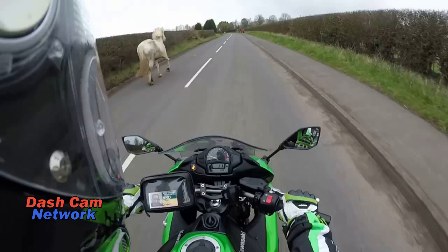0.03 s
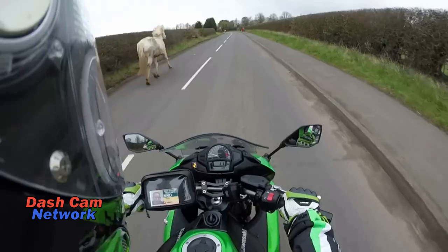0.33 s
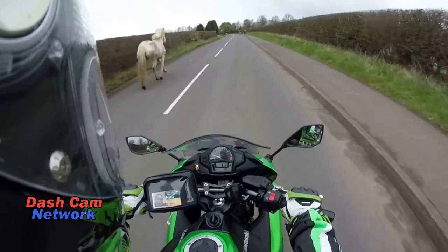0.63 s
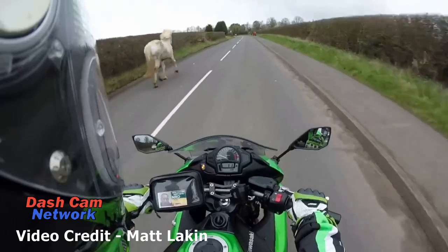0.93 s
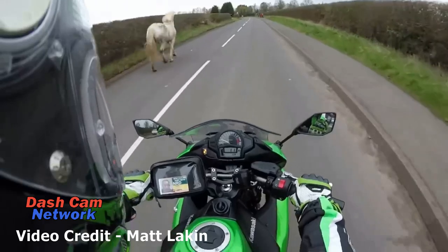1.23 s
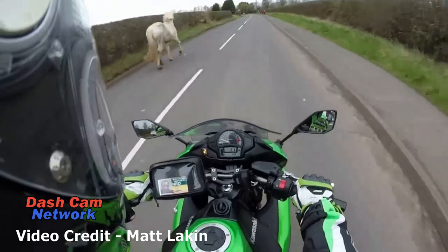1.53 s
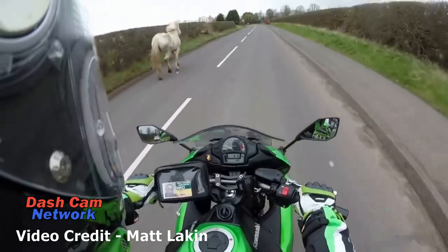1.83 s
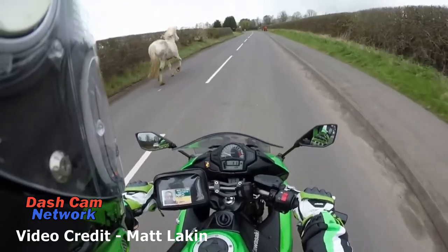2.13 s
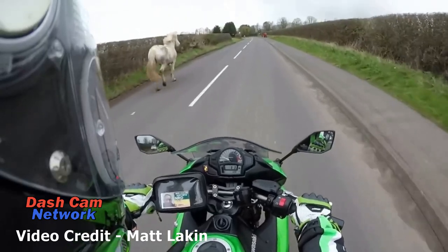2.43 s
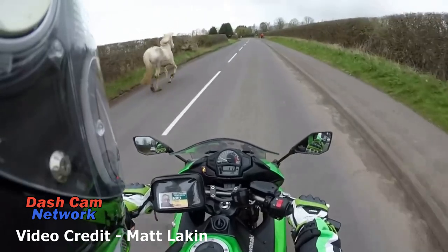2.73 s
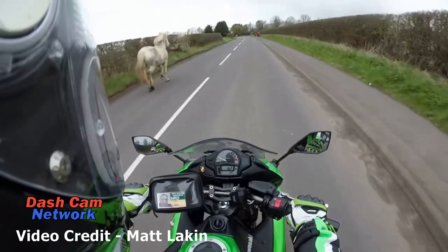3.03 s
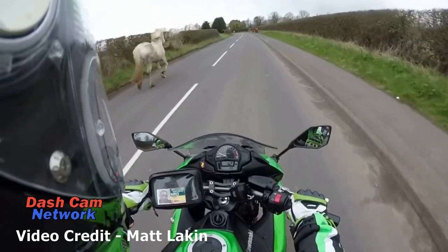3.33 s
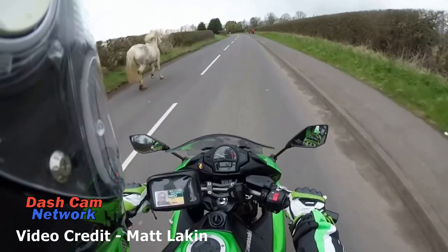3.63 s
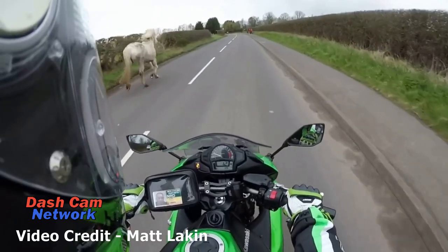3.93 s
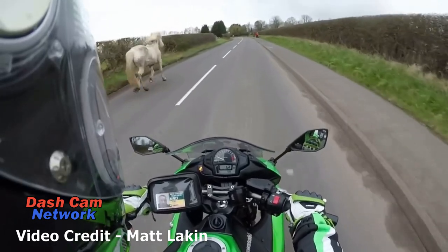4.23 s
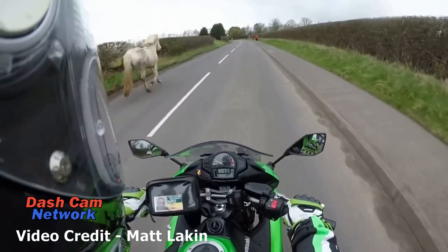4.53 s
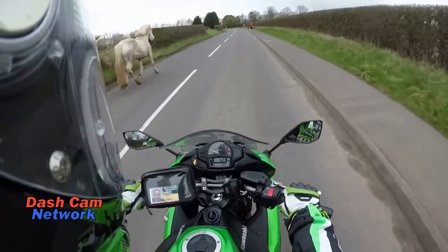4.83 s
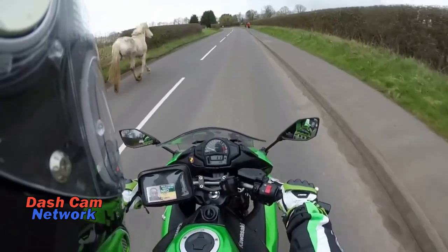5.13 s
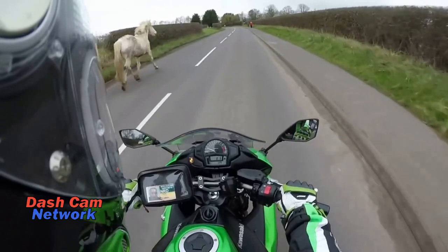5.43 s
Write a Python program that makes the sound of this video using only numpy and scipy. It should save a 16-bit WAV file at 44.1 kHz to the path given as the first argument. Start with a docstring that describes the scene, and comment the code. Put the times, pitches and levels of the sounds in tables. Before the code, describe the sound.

Steady trotting hoofbeats on a road sound over a slow motorcycle's pulsing exhaust, ticking valves and low wind rumble.

```python
"""A country road, heard from the helmet of a rider on a twin-cylinder motorcycle at low revs.
The exhaust throbs in paired puffs over ticking valves, wind and tyre rush. Four times the throttle
eases and the throb softens; in the two deepest dips the gears whine. The machine squeaks once.
A loose horse trots just ahead, its hooves clopping on the asphalt. It all cuts in after a short silence."""
import sys
import numpy as np
from scipy import signal
from scipy.fft import rfft, irfft, next_fast_len
from scipy.io import wavfile
from scipy.ndimage import map_coordinates

SR = 44100
rng = np.random.default_rng(int(sys.argv[2]) if len(sys.argv) > 2 else 0)


def log_audio(samples):
    """Write samples as a 16-bit WAV file to the path given in sys.argv[1]."""
    # one column per channel
    frames = np.atleast_2d(samples).T
    # limit to full scale, then quantise
    limited = np.clip(frames, -1, 1)
    pcm = np.round(limited * 32767).astype(np.int16)
    wavfile.write(sys.argv[1], SR, pcm)


N = 242550


def amp(db):
    """Turn decibels into a number to multiply by."""
    return 10 ** (np.asarray(db) / 20)


def unit(x):
    """Scale a sound so that its average level (rms) is 1."""
    return x / np.sqrt(np.mean(x ** 2) + 1e-20)


def curve(rows):
    """Join (time, value) points with straight lines, one value per sample."""
    times, values = np.transpose(rows)
    return np.interp(np.arange(N) / SR, times, values)


def wobble(rate):
    """A smooth random curve through rate points a second."""
    points = rng.standard_normal(int(N * rate / SR) + 4)
    return map_coordinates(points, [np.arange(N) * rate / SR])


def noise():
    """Fresh white noise."""
    return rng.standard_normal(N)


def filtered(x, response):
    """Multiply each frequency in x by response(frequency)."""
    size = next_fast_len(N + SR // 2)
    return irfft(rfft(x, size) * response(np.fft.rfftfreq(size, 1 / SR)), size)[:N]


def colour(x, spectrum):
    """Shape the tone of x with (frequency [Hz], level [dB]) points, at average level 1."""
    freqs, db = np.transpose(spectrum)
    return unit(filtered(x, lambda hz: amp(np.interp(np.log(hz + 1), np.log(freqs), db, right=-np.inf))))


def since(start):
    """Seconds since start at every sample, 0 before it."""
    return np.maximum(np.arange(N) / SR - start, 0)


def swell(start, length, rise_s, fall_s):
    """A curve that rises from 0 to 1, holds and falls back."""
    t = since(start)
    return np.clip(np.minimum(t / rise_s, (length - t) / fall_s), 0, 1)


def burst(t, hz, rise_s):
    """The ring of something struck: it swells to 1 in rise_s and dies away."""
    age = np.maximum(t, 0) / rise_s
    return age ** 2 * np.exp(2 - 2 * age) * np.sin(2 * np.pi * hz * t)


def whistle(hz, waver, flutter_db):
    """An unsteady tone that follows a pitch curve."""
    phase = 2 * np.pi * np.cumsum(hz * (1 + waver * wobble(110))) / SR
    return amp(flutter_db * wobble(30)) * np.sin(phase)


def firings(cycle, rate, scatter_db):
    """One firing a cycle: the seconds from the nearest one, and its random size."""
    count = np.round(cycle).astype(int)
    size = amp(scatter_db * rng.standard_normal(np.ptp(count) + 1))
    return (cycle - count) / rate, size[count - count.min()]


def exhaust(cycle, rate):
    """Two cylinders fire about half a turn apart, then rest; each puff shakes the silencer and rasps."""
    base_hz, base_width_s, rasp_width_s = 98, 0.004, 0.0036
    drop_db = throttle_drop()
    # weak firings push the gas out more slowly, so they sound deeper, and they stumble
    gas_speed = amp(0.19 * (0.5 - drop_db))
    stumble = np.clip(0.007 * (drop_db - 2), 0, 0.03) * wobble(25)
    boom, gas = np.zeros(N), np.zeros(N)
    for place_in_cycle, db in [(0.757, -1), (0.99, 0)]:
        t, size = firings(cycle + stumble - place_in_cycle, rate, scatter_db=0.63)
        puff = np.exp(-0.5 * (gas_speed * t / base_width_s) ** 2)
        boom -= amp(db) * size * puff * np.sin(2 * np.pi * base_hz * gas_speed * t)
        gas += size * np.exp(-0.5 * (t / rasp_width_s) ** 2)
    # each puff repeats faintly in the exhaust pipe
    pipe_echo = amp(-9) * np.interp(np.arange(N) - 0.01454 * SR, np.arange(N), boom)
    # tone of the rushing gas: (frequency [Hz], level [dB])
    rasp_tone = [(130, -18.5), (200, -3.5), (260, -2), (340, -16), (480, -13.5), (620, -3), (730, 6),
                 (860, -16), (1000, -27), (1400, -22.5), (3000, -59)]
    rasp = colour(gas * noise(), rasp_tone)
    return amp(-drop_db) * (amp(-15.48) * unit(boom + pipe_echo) + amp(-29.5) * rasp)


def valves(cycle):
    """The engine's moving parts hiss in time with the firings; ticking valves make its casing ring."""
    # tone of the hiss: (frequency [Hz], level [dB])
    hiss_tone = [(1000, -14.5), (1500, -6), (2050, -8.5), (2400, 0), (2620, -5), (2950, -1.5), (3500, -12),
                 (5000, -12.5), (5500, -17.5), (6600, -20.5), (8400, -31), (11000, -37), (13500, -43),
                 (16000, -70.5)]
    swell_db = 0.52 * np.cos(2 * np.pi * (cycle - 0.95)) + 0.5 * wobble(12) + 0.88 * wobble(200)
    hiss = amp(swell_db) * colour(noise(), hiss_tone)
    # four loosely timed ticks a cycle, hardest shortly before the firings
    ticks = np.diff(np.floor(4 * (cycle + 0.03 * wobble(40))), prepend=0) > 0
    tick_db = 3.5 * np.cos(2 * np.pi * (cycle - 0.65)) + 3 * np.minimum(noise(), 1.5)
    t = np.arange(SR // 20) / SR
    ring = burst(t, hz=2377, rise_s=0.0032) + amp(-4.5) * burst(t, hz=2714, rise_s=0.0028)
    casing = unit(signal.fftconvolve(ticks * amp(tick_db), ring)[:N])
    return amp(-0.37 * throttle_drop()) * (amp(-42.2) * hiss + amp(-48.5) * casing)


def wind():
    """Gusts of wind buffet the helmet with a low rumble."""
    # strength of the wind: (time [s], relative level [dB])
    gusts = [(0.4, -29.5), (0.8, -24), (1.15, -28.5), (1.35, -25.5), (1.65, -29), (2.45, -25), (3.7, -26),
             (4.15, -20.5), (4.9, -28), (5.5, -23)]
    # tone of the rumble: (frequency [Hz], level [dB])
    rumble_tone = [(15, -10), (40, 2), (110, -1), (180, -4.5), (260, -4.5), (340, -11), (500, -13),
                   (900, -41), (2000, -55.5)]
    return amp(curve(gusts) + 3 + 0.62 * wobble(12)) * colour(noise(), rumble_tone)


def road_rush():
    """The tyres and the engine keep up a hollow rush."""
    # tone of the rush: (frequency [Hz], level [dB])
    rush_tone = [(250, -3), (450, -5.5), (700, 2.5), (850, -1), (1000, -7), (1170, -6), (1350, -21),
                 (2000, -25.5), (4000, -57)]
    level_db = -27.5 + 0.6 * wobble(3) + 1.5 * wobble(30)
    return amp(level_db) * colour(noise(), rush_tone)


def shoe_crack(t):
    """A horseshoe hits the asphalt with a short, bright snap of noise."""
    # tone of the crack: (frequency [Hz], level [dB])
    crack_tone = [(500, -40), (1100, 3), (2500, 4.5), (3300, -6.5), (4800, -15.5), (8000, -28),
                  (12000, -33.5), (16000, -45.5)]
    freqs, db = np.transpose(crack_tone)
    gain = amp(np.interp(np.log(np.fft.rfftfreq(len(t), 1 / SR) + 1), np.log(freqs), db))
    grit = unit(irfft(rfft(rng.standard_normal(len(t))) * gain, len(t)))
    rise = 1 - np.exp(-(t / 0.0011) ** 2)
    return rise * amp(-60 * t / 0.024) * grit


def hoof(force_db, base_hz):
    """A hoof cracks on the road, knocks once and rings hollow; the hedge scatters a faint echo."""
    # the hollow ring of a hoof: (frequency [Hz], level [dB], time to its peak [s])
    rings = [(810.6, 2, 0.0048), (653, -3, 0.0048), (763, -6, 0.0084)]
    t = np.arange(SR // 8) / SR
    landed = t - 0.0008  # the full weight follows the first touch
    knock = burst(landed, 0.887 * base_hz, rise_s=0.0017)
    hollow = np.zeros(len(t))
    for hz, db, rise_s in rings:
        stray_db, stray_percent = rng.standard_normal(2)
        hollow += amp(db + stray_db) * burst(landed, hz * (1 + stray_percent / 100), rise_s)
    hedge = amp(-60 * t / 0.17) * rng.standard_normal(len(t))
    echo = signal.fftconvolve(knock, hedge)[:len(t)]
    # soft steps sound a little more hollow; hard steps crack more
    clop = knock + amp(-8 - 0.15 * force_db) * hollow + amp(-13.5) * echo / np.abs(echo).max()
    crack = amp(-18.5 + 1.3 * force_db) * shoe_crack(t)
    return amp(force_db + 0.34) * clop / np.abs(clop).max() + crack


def horse():
    """Hooves land in diagonal pairs, loud and soft by turns; a hoof that lands late knocks lower."""
    # beats of the trot; a size of 0 means both hooves land as one:
    # (time [s], force [dB], base pitch [Hz], second hoof's delay [s], its size [times the first])
    beats = [(0.408, 0, 862, 0.019, .15), (0.747, -14, 690, 0, 0), (1.044, 0, 805, 0.014, 0.24),
             (1.371, -18, 710, 0.0037, 0), (1.677, 0, 753, 0.01, 0.47), (2.01, -11.5, 640, 0, 0.034),
             (2.305, -4, 830, 0.019, 0.65), (2.65, -8, 690, 0, 0.022), (2.947, 0, 855, 0.014, 0.99),
             (3.279, -8, 686, 0, 0.034), (3.583, -0.5, 810, .019, 0.52), (3.905, -7, 834, 0.0069, 0),
             (4.222, -1, 850, 0.024, 0.41), (4.563, -11, 690, 0.0043, 0), (4.86, -2.5, 864, 0.027, 0.65),
             (5.207, -13.5, 840, 0, 0.25)]
    steps = [(start, db, hz) for start, db, hz, _, _ in beats]
    for start, db, hz, delay, size in beats:
        if size > 0:
            steps.append((start + delay, db + 20 * np.log10(size), 0.888 * hz))
    out = np.zeros(N + SR)
    for start, db, hz in steps:
        step = hoof(db, hz)
        out[round(start * SR):][:len(step)] += step
    return out[:N]


def throttle_drop():
    """How many dB the exhaust drops as the rider closes the throttle, holds it and opens it again."""
    # each easing off: (time [s], time until it starts to reopen [s], drop [dB])
    ease_offs = [(1.04, 0.37, 6), (2.78, 0.24, 2.5), (3.48, .2, 4), (4.36, 0.59, 5)]
    close_s, reopen_s = 0.13, 0.22
    return sum(db * swell(start, wait + reopen_s, close_s, reopen_s) for start, wait, db in ease_offs)


def gears():
    """While the rolling bike drives the engine, the gear teeth whine, starting low and settling higher."""
    # each whine: (time [s], length [s], level [dB])
    whines = [(1.208, 0.26, -33.5), (4.47, .57, -34.5)]
    settled_hz, sag_hz, settle_s = 1143, 110, 0.1
    out = np.zeros(N)
    for start, length, db in whines:
        hz = settled_hz - sag_hz * np.exp(-since(start) / settle_s)
        tone = whistle(hz, waver=0.022, flutter_db=2.2)
        out += amp(db) * swell(start, length, rise_s=0.06, fall_s=0.13) * tone
    return out


def squeak():
    """Something on the machine gives one brief, rough, rising squeak."""
    start_s, length_s, start_hz, climb_hz_per_s = 2.06, 0.055, 2380, 8500
    hz = start_hz + climb_hz_per_s * np.minimum(since(start_s), length_s)
    tone = whistle(hz, waver=0.04, flutter_db=3)
    return amp(-37.5) * swell(start_s, length_s, rise_s=0.008, fall_s=0.017) * tone


def scene():
    """Add the motorcycle, the wind, the road and the horse into one channel."""
    # how fast the engine spins: (time [s], speed [turns a minute])
    revs = [(0.55, 1686), (0.9, 1745), (1.25, 1557), (1.6, 1655), (1.98, 1658), (2.4, 1887), (2.98, 1673),
            (3.42, 1758), (4.3, 1819), (4.5, 1519), (4.75, 1634), (5.0, 1614), (5.2, 1780)]
    rate = curve(revs) / 120  # cycles a second: a four-stroke cycle takes two turns
    cycle = np.cumsum(rate) / SR
    motorcycle = exhaust(cycle, rate) + valves(cycle) + gears() + squeak()
    return (motorcycle + wind() + road_rush() + horse())[None]


def record(dry):
    """The sound starts abruptly, its loudest peaks are flattened and the highest treble is cut."""
    start_s, top_hz = 0.2235, 15700
    sound = dry[0] * (np.arange(N) / SR >= start_s)
    flattened = sound / (1 + np.abs(sound) ** 10) ** (1 / 10)
    return filtered(flattened, lambda hz: hz < top_hz)[None]


dry = scene()
out = record(dry)
log_audio(out)
```